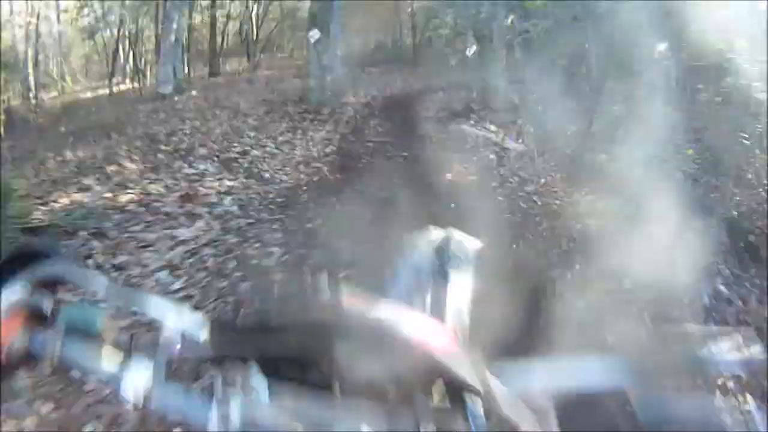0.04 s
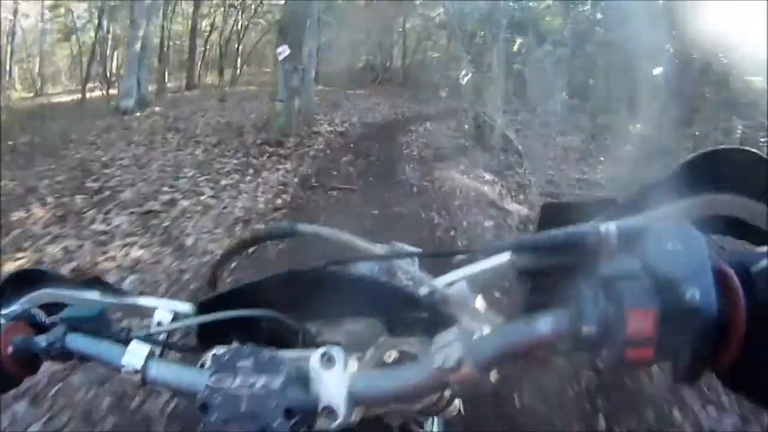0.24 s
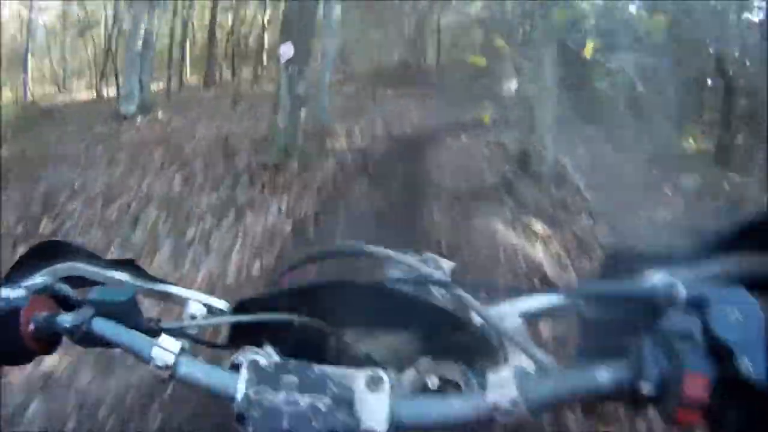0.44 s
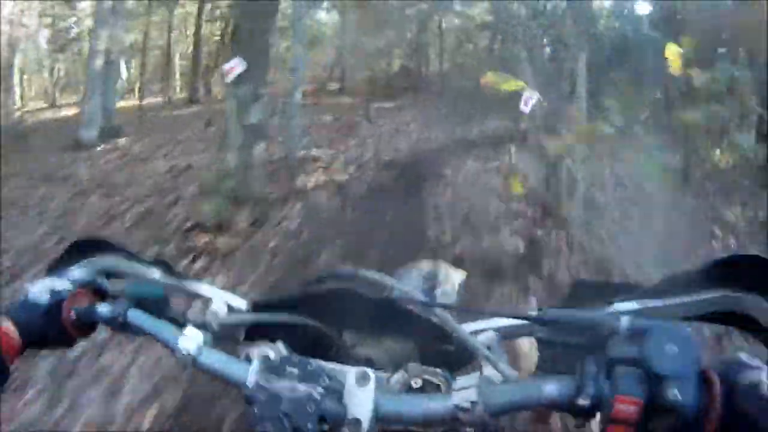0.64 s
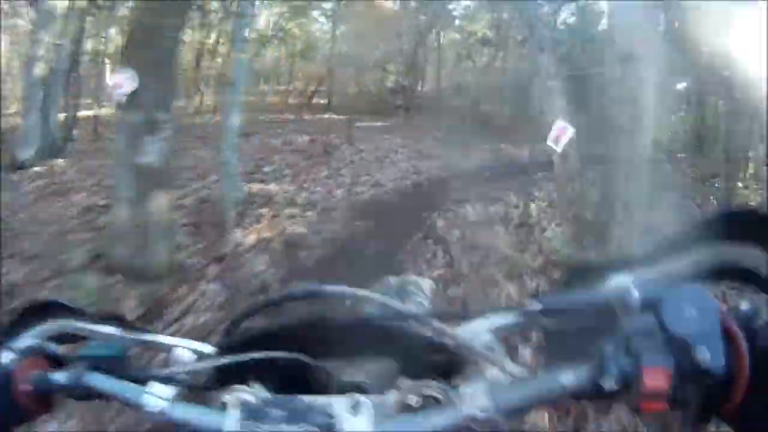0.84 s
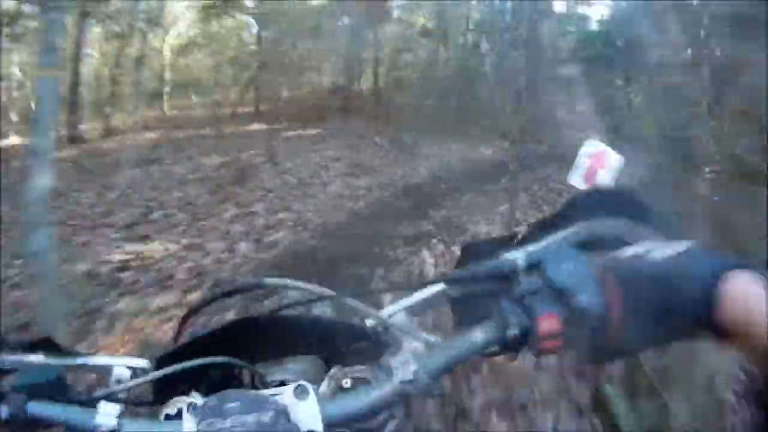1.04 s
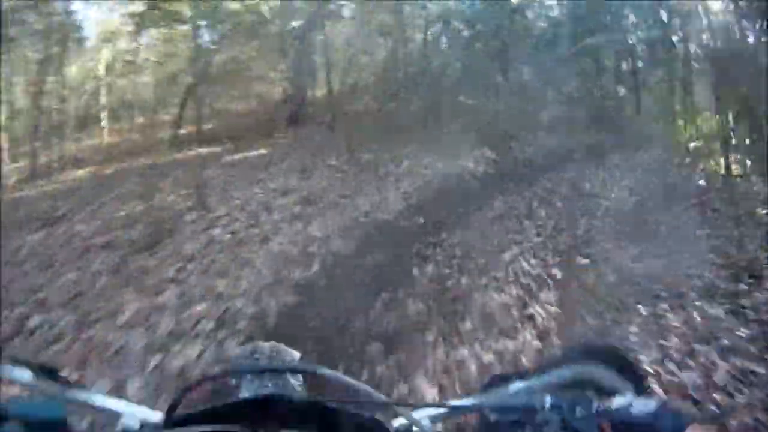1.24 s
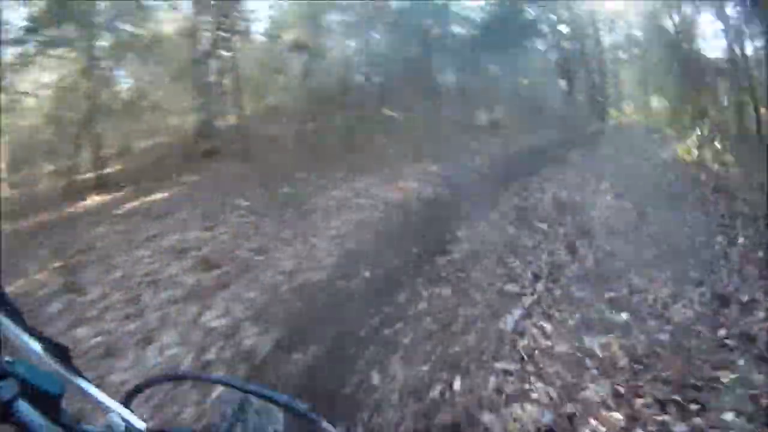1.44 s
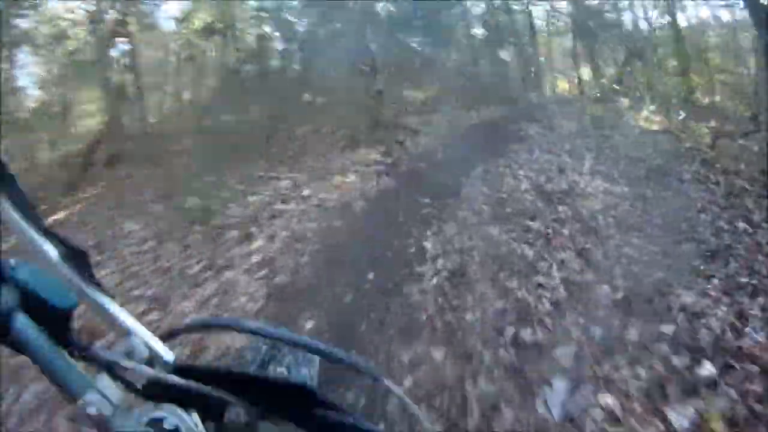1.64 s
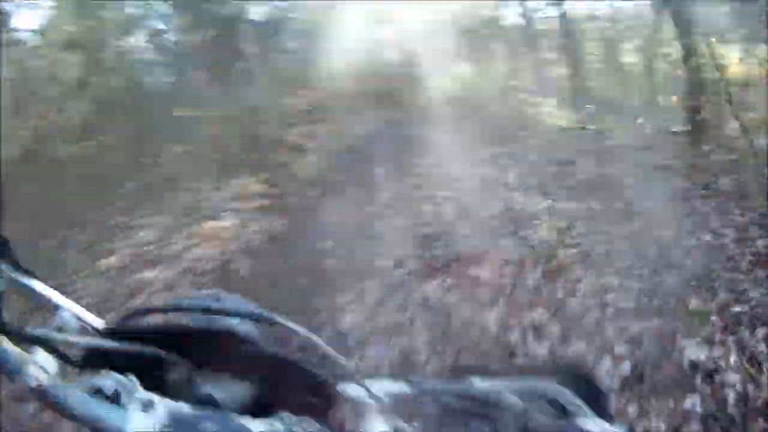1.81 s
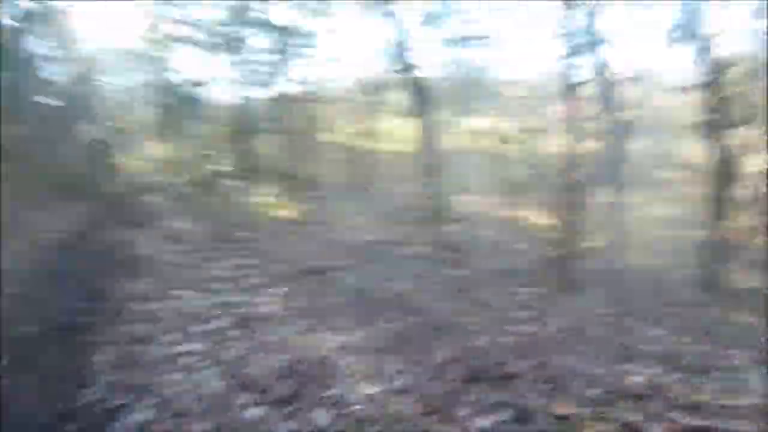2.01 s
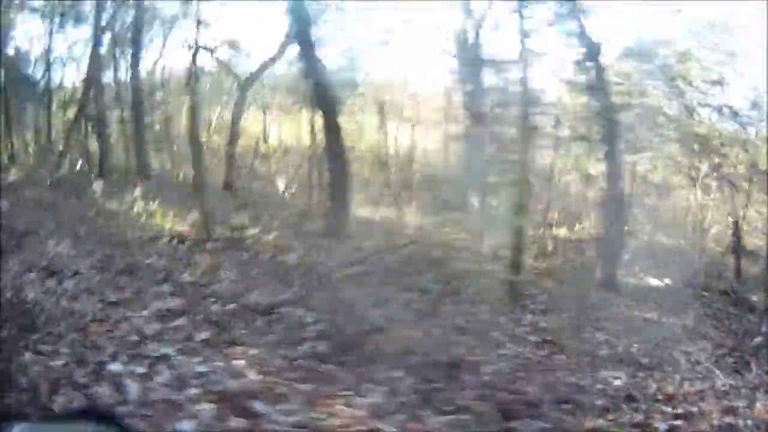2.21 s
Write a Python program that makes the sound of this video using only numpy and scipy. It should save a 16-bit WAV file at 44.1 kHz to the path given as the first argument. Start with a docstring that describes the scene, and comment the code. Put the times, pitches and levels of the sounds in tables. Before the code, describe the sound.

Raspy four-stroke dirt bike engine heard from the rider's seat: uneven revving for a second, a quieter sputtering coast with pops, another brief rev, then fading with last pops; low bumps, wind rumble, gritty low-quality microphone.

```python
"""A single-cylinder four-stroke dirt bike on a rough trail, heard from a small camera on the rider.
From the start the pipe sounds as harmonics and gated roar, over resonant rattle, jolts and wind noise.
After a second the throttle shuts: the orders smear and the pipe pops, as decaying noise and a sine thud.
From about 1.65 s the roar swells again, then sinks amid two last pops.
Throughout, the camera samples at a low rate and holds, so the spectrum is mirrored into the treble."""
import sys
import numpy as np
from scipy import signal
from scipy.fft import rfft, irfft, next_fast_len
from scipy.io import wavfile
from scipy.ndimage import uniform_filter1d, map_coordinates

SR = 44100
rng = np.random.default_rng(int(sys.argv[2]) if len(sys.argv) > 2 else 0)


def materialize(psi):
    """Save the field psi as 16-bit PCM at rate SR to the path in sys.argv[1].

    A 1-D psi becomes a single channel; in a 2-D psi each row is a channel.
    """
    bounded = np.clip(np.atleast_2d(psi).T, -1, 1)
    quanta = np.round(bounded * 32767).astype(np.int16)
    wavfile.write(sys.argv[1], SR, quanta)


def convert_level_to_amplitude(level_db):
    """Map a level in decibels to its linear amplitude factor."""
    exponent = np.asarray(level_db, float) / 20
    return 10 ** exponent


N = 100107  # length in samples

# Firing rate of the engine: (time [s], rate [Hz])
FIRING_RATE = [(0, 50.7), (.09, 48.1), (.2, 52.4), (.31, 54), (.35, 57.5), (.4, 70.6), (.44, 75.2),
               (.53, 60.6), (.61, 58.1), (.755, 64), (.8, 60), (.86, 71.5), (.885, 75), (.94, 63.3),
               (.99, 69.3), (1.11, 58), (1.5, 51), (1.71, 63.2), (1.8, 55.8), (1.95, 58.6), (2.05, 47.9),
               (2.12, 50), (2.2, 53.5), (2.27, 57)]
# Engine balance: (time [s], roar above the split [dB], pipe tone gain [dB], odd orders' gain [dB],
# fourth order's gain [dB])
ENGINE_LEVELS = [(0, -30, -40, -3, 4), (.3, -31.5, -38, 0, -4), (.43, -25.5, -29.5, -0.5, 6),
                 (.53, -26.5, -32.5, -8, 0.5), (.75, -25, -35.5, -0.5, 4.5), (.88, -26.5, -31.5, -7.5, 6.5),
                 (1.005, -29, -37.5, 6.5, 5), (1.025, -22.5, -48, 16, -4), (1.13, -36.5, -44.5, -7, -3),
                 (1.24, -41.5, -47, -10, -3), (1.55, -41, -51, -5.5, -0.5), (1.64, -42, -37.5, -1, 7),
                 (1.66, -30.5, -37.5, 5.5, -2), (1.72, -25.5, -31.5, -6, 1),
                 (1.93, -29.5, -41.5, 4.5, -2.5), (1.99, -29, -53, -4, -12), (2.06, -38, -49.5, 2, 0),
                 (2.12, -33, -38, 0, 0.5), (2.21, -33, -42.5, -7, 0), (2.27, -36, -45, 10, -7)]
# Shaking of the machine: (time [s], first order [dB], rattle [dB])
SHAKE_LEVELS = [(0, -27, -39.5), (.15, -58, -39.5), (.19, -20, -37), (.3, -35, -54), (.5, -53, -45),
                (.56, -41, -33.5), (.72, -63, -46), (1.1, -35.5, -50.5), (1.5, -42.5, -60),
                (1.62, -56, -48), (1.69, -38, -30.5), (1.81, -34, -49), (1.87, -26, -31.5),
                (2.01, -38.5, -79), (2.12, -23, -39.5), (2.27, -36, -46.5)]
# Gain of the pipe for the low orders: (frequency [Hz], gain [dB])
PIPE_GAIN = [(90, -8), (125, -1), (180, -8.5), (250, 2), (310, -4.5), (380, -8.5), (500, -10), (590, -23),
             (720, -11), (950, -13)]
# Relative spectrum of the exhaust roar: (frequency [Hz], density [dB per Hz])
ROAR_SPECTRUM = [(300, -6.5), (450, -6), (570, -14), (720, -4), (800, -16), (920, 0.5), (1000, -13),
                 (1100, -2), (1300, -0.5), (1400, -9), (1550, 0.5), (1800, -6), (2050, 0), (2480, -5),
                 (2800, -4), (3170, -11.5), (3600, -6.5), (4200, -15), (4950, -10.5), (5400, -13),
                 (6000, -28.5)]
# Resonances of the rattling parts: (centre [Hz], width [Hz], gain [dB])
RATTLE_MODES = [(3403, 40, 12.5), (510, 49, 1), (942, 39, 0.5)]
# Moments when the sound thins: (centre [s], length [s])
THIN_MOMENTS = [(0.263, 0.014), (0.99, 0.0088), (1.028, 0.016), (1.421, 0.0055), (1.799, 0.015),
                (1.997, 0.016)]
# Narrow tones that stay in a thin moment: frequency [Hz]
LEFT_TONES_HZ = [933, 1200, 1640, 2148, 2750]
# Pops in the pipe: (time [s], crack level before trim [dB], thud level before trim [dB], crack centre [Hz])
PIPE_POPS = [(1.161, -19, -32, 1200), (1.169, -28, -35, 1180), (1.1928, -24, -47, 2820),
             (1.198, -27, -45, 2240), (1.326, -25, -37, 1180), (1.341, -27, -45, 2430),
             (1.448, -31.5, -43, 1750), (1.607, -20, -33.5, 2760), (2.0797, -20, -33.5, 2530),
             (2.122, -23, -48, 2400)]
# Jolts of the mount: (time [s], envelope peak [dB], frequency [Hz], length [s])
MOUNT_JOLTS = [(0.035, -21.5, 47.2, 0.055), (0.165, -18.5, 111, 0.011), (0.539, -24.5, 47, 0.06),
               (0.954, -23.5, 32, 0.059), (1.08, -20.5, 46, 0.058), (1.354, -27.5, 67.4, 0.078),
               (1.493, -23.5, 41.7, 0.05), (1.627, -33, 139, 0.032), (1.742, -24, 48, 0.067),
               (2.245, -20, 50.4, 0.036)]
# Relative spectrum of the wind: (frequency [Hz], density [dB per Hz])
WIND_SPECTRUM = [(15, -36), (30, -1), (60, -1), (90, -12), (200, -27), (400, -90)]

A_FIRING_S = 2.1212  # one firing falls here
COAST_S = (1.03, 1.65)  # throttle shut between these times
COAST_RAD, WAVER_RAD = 0.85, 0.22  # phase wander: first order with throttle shut; fourth order always
SIZE_DB, WAVER_DB = 1.37, 1.95  # scatter from firing to firing; wander of each order's level
BLUR_HZ, SHARP_PER_HZ = 66.4, 0.041  # firings stand apart below this rate, the sharper the slower
SPLIT_HZ, FOLLOW, TONE_UNDER_DB = 1370, 0.78, 7.5  # below the split the roar follows the pipe tone
REPEAT = 0.55  # weight of the roar pattern that repeats each firing, against noise at 1
RATTLE_PULSE, TAP_DB = 2.45, 1.5  # decay exponent of the rattle over one firing; scatter of its taps
THIN_DB, LEFT_WIDTH_HZ = -14.5, 52  # broad sound at full thinning; resonance width of the tones left
LEFT_DB = 4.5  # gain of one pass of the resonances, which are applied twice
CRACK_T60_S, CRACK_OCTAVES, CRACK_RISE_S = 0.047, 1.35, 0.00047
THUD_HZ, THUD_T60_S = 216, 0.068
WIND_DB, GUST_DB = -39.5, 4.5  # rms level; depth of the lumps
HOLD_HZ, TOP_HZ = 12000, 15280  # sampling rate of the camera; upper limit of the held sound


def unit(x):
    """Normalisation: the signal is scaled to rms 1."""
    return x / np.sqrt(np.mean(x ** 2) + 1e-20)


def along(points, hz):
    """Logarithmic frequency scale: (Hz, value) points are joined along it."""
    f, value = np.transpose(points)
    return np.interp(np.log(hz + 1), np.log(f + 1), value)


def curves(rows):
    """Linear interpolation in time: one value a sample for each column after the time."""
    s, *columns = np.transpose(rows)
    return [np.interp(np.arange(N) / SR, s, c) for c in columns]


def wobble(rate):
    """Slow random modulation: a smooth curve through rate random knots a second."""
    knots = rng.standard_normal(int(N * rate / SR) + 4)
    return map_coordinates(knots, [np.arange(N) * rate / SR])


def filtered(x, response):
    """Linear filtering: the spectrum is multiplied by a complex response of frequency."""
    m = next_fast_len(N + SR // 4)
    return irfft(rfft(x, m) * response(np.fft.rfftfreq(m, 1 / SR)), m)[..., :N]


def coloured(x, spectrum):
    """Spectral shaping: the signal is weighted by a spectrum and brought to rms 1."""
    return unit(filtered(x, lambda hz: convert_level_to_amplitude(along(spectrum, hz))))


def ring(f, modes):
    """Modal superposition: the summed response of (Hz, width Hz, dB) damped resonances."""
    return sum(convert_level_to_amplitude(db) * 1j * f * w / (c * c - f * f + 1j * f * w) for c, w, db in modes)


def firing_pulses(turn, sharp, scatter_db):
    """Amplitude modulation by combustion: each firing decays exponentially over its own period."""
    return unit(np.exp(-sharp * (turn % 1)) * convert_level_to_amplitude(scatter_db))


def pipe_orders(turn, coast, tone_gain_db, odd_db, fourth_db):
    """Harmonic series of a periodic source: orders of the firing rate, weighted by the pipe."""
    (hz,) = curves(FIRING_RATE)
    hz = uniform_filter1d(hz, size=900)
    tone = np.zeros(N)
    for k in range(2, 22):
        level_db = along(PIPE_GAIN, k * hz) + odd_db * (k % 2) + fourth_db * (k == 4)
        level_db = level_db + WAVER_DB * wobble(14)
        wander = WAVER_RAD * k / 4 * wobble(21.96)
        smear = COAST_RAD * coast * np.sqrt(k) * wobble(30)
        tone += convert_level_to_amplitude(level_db) * np.sin(2 * np.pi * k * turn + wander + smear + k * k)
    return convert_level_to_amplitude(tone_gain_db) * tone


def exhaust_roar(turn, hz, coast, scatter_db, roar_db, tone_gain_db):
    """Modulated jet noise: turbulence, part of it repeating each firing, gated by the firings."""
    cycle = rng.standard_normal(size=200)
    cycle = cycle - uniform_filter1d(cycle, size=15, mode='wrap')
    pattern = unit(cycle[(turn % 1 * 200).astype(int)])
    sharp = np.clip(SHARP_PER_HZ * (BLUR_HZ - hz), 0.1, None)
    turbulence = rng.standard_normal(N) + REPEAT * (1 - coast) * pattern
    roar = coloured(firing_pulses(turn, sharp, scatter_db) * turbulence, ROAR_SPECTRUM)
    low = filtered(roar, lambda f: 1 / (1 + (f / SPLIT_HZ) ** 8))
    high = roar - low
    follow_db = FOLLOW * (tone_gain_db - roar_db + TONE_UNDER_DB)
    return convert_level_to_amplitude(roar_db) * (high + low * convert_level_to_amplitude(follow_db))


def rattle(turn, coast, scatter_db, rattle_db):
    """Forced resonance: taps and noise pulses at the firing rate excite the loose parts."""
    taps = unit(np.diff(np.floor(turn), prepend=np.floor(turn[0])) * convert_level_to_amplitude(scatter_db))
    buzz = firing_pulses(turn, RATTLE_PULSE, scatter_db) * rng.standard_normal(N)
    drive = 0.78 * (1 - coast) * taps + buzz  # no taps with the throttle shut
    return convert_level_to_amplitude(rattle_db) * unit(filtered(drive, lambda f: ring(f, RATTLE_MODES)))


def engine():
    """Synchronous excitation: orders, roar and rattle share the phase of one firing cycle."""
    (hz,) = curves(FIRING_RATE)
    roar_db, tone_gain_db, odd_db, fourth_db = curves(ENGINE_LEVELS)
    first_db, rattle_db = curves(SHAKE_LEVELS)
    hz = uniform_filter1d(hz, size=900)
    turn = np.cumsum(hz) / SR  # counts firings
    turn = turn + 1 - turn[round(A_FIRING_S * SR)] % 1
    shut = abs(np.arange(N) / SR - np.mean(COAST_S)) < np.ptp(COAST_S) / 2
    coast = uniform_filter1d(1. * shut, size=600)
    scatter = rng.standard_normal((int(turn[-1]) + 1, 2))[turn.astype(int)]  # one draw a firing
    tone = pipe_orders(turn, coast, tone_gain_db, odd_db, fourth_db)
    first = -convert_level_to_amplitude(first_db) * np.cos(2 * np.pi * turn)
    roar = exhaust_roar(turn, hz, coast, SIZE_DB * scatter[:, 0], roar_db, tone_gain_db)
    return tone + first + roar + rattle(turn, coast, TAP_DB * scatter[:, 1], rattle_db)


def thinned(x):
    """Time-varying selective filtering: the broad sound sinks for a moment and narrow tones stay."""
    t = np.arange(N) / SR
    share = sum(np.exp(-(2 * (t - s) / length) ** 2) for s, length in THIN_MOMENTS)
    share = np.clip(share, 0, 1)
    low = filtered(x, lambda f: f < 110)  # the bass is spared
    modes = [(c, LEFT_WIDTH_HZ, LEFT_DB) for c in LEFT_TONES_HZ]
    tones_left = filtered(x, lambda f: ring(f, modes) ** 2)
    return low + convert_level_to_amplitude(THIN_DB * share) * (x - low) + share * tones_left


def pops():
    """Impulsive excitation of the pipe: a fast-decaying noise crack with a damped sine thud."""
    t = np.arange(N) / SR
    noise = coloured(rng.standard_normal(N), ROAR_SPECTRUM)
    out = np.zeros(N)
    for s, crack_db, thud_db, hz in PIPE_POPS:
        since = np.clip(t - s, 0, None)
        band = unit(filtered(noise, lambda f: np.exp(-(np.log2((f + 1) / hz) / CRACK_OCTAVES) ** 2)))
        rise = 1 - np.exp(-since / CRACK_RISE_S)
        out += rise * convert_level_to_amplitude(crack_db - 5.5 - 60 * since / CRACK_T60_S) * band
        out -= convert_level_to_amplitude(thud_db + 6 - 60 * since / THUD_T60_S) * np.sin(2 * np.pi * THUD_HZ * since)
    return out


def jolts():
    """Transient oscillation: each bump swings the mount at a low frequency under a sine-squared bell."""
    t = np.arange(N) / SR
    out = np.zeros(N)
    for s, db, hz, length in MOUNT_JOLTS:
        bell = np.sin(np.pi * np.clip((t - s) / length, 0, 1)) ** 2
        out += convert_level_to_amplitude(db) * bell * np.sin(2 * np.pi * hz * (t - s))
    return out


def wind():
    """Turbulent pressure on the microphone port: low-frequency noise of randomly varying strength."""
    gusts = convert_level_to_amplitude(GUST_DB * wobble(8.4))
    return convert_level_to_amplitude(WIND_DB) * coloured(gusts * rng.standard_normal(N), WIND_SPECTRUM)


def scene():
    """Superposition: the sources add, and only the engine is thinned."""
    return (thinned(engine()) + pops() + jolts() + wind())[None]


def roll_off(x):
    """The treble ends steeply here."""
    return signal.sosfilt(signal.butter(12, 16450, fs=SR, output="sos"), x)


def record(dry):
    """Sampling and zero-order hold: the band repeats about the sampling rate under a sinc."""
    # the band limit also undoes the sinc's droop within the band
    base = filtered(dry, lambda hz: (hz < HOLD_HZ / 2) / np.sinc(np.minimum(hz / HOLD_HZ, 0.5)))
    copies = base * (1 + 2 * np.cos(2 * np.pi * HOLD_HZ * np.arange(N) / SR))
    held = filtered(copies, lambda hz: np.sinc(hz / HOLD_HZ) * (hz < TOP_HZ))
    return roll_off(held)


dry = scene()
out = record(dry)
materialize(out)
```